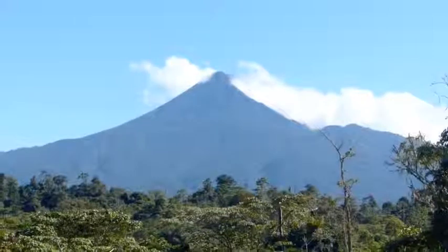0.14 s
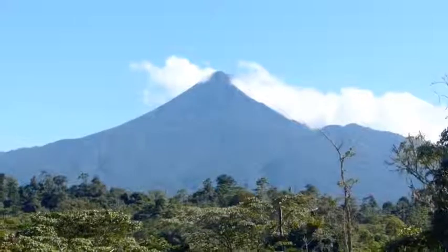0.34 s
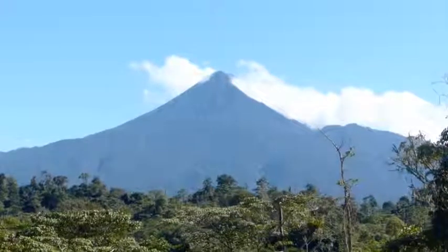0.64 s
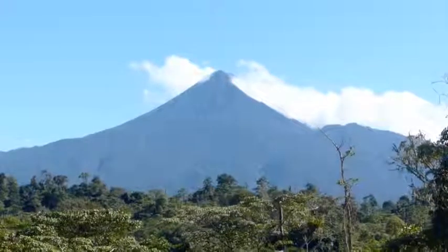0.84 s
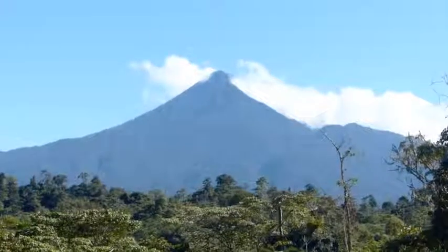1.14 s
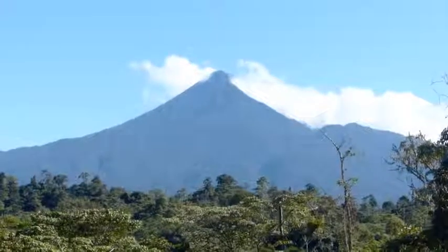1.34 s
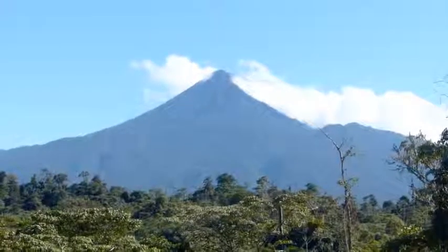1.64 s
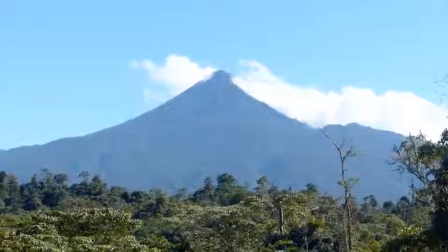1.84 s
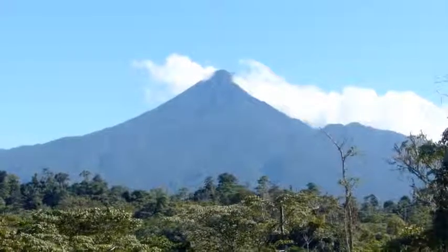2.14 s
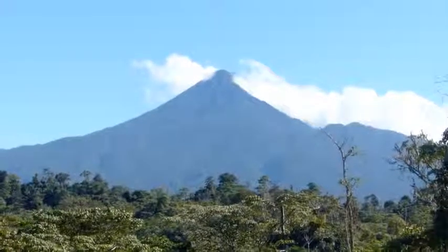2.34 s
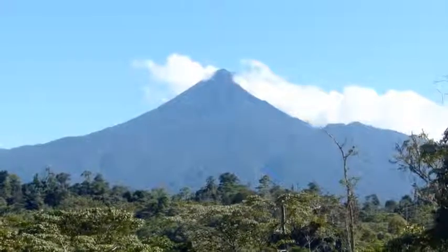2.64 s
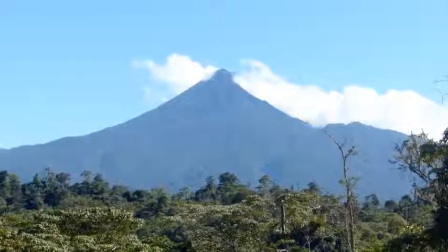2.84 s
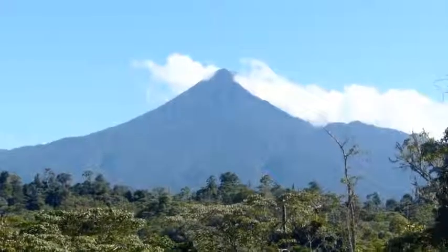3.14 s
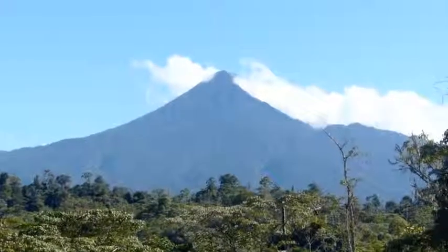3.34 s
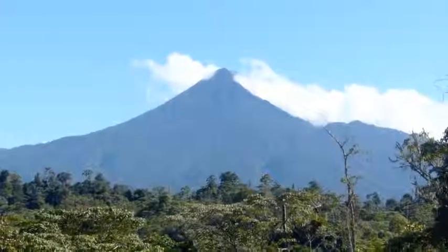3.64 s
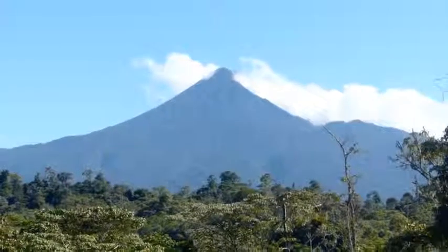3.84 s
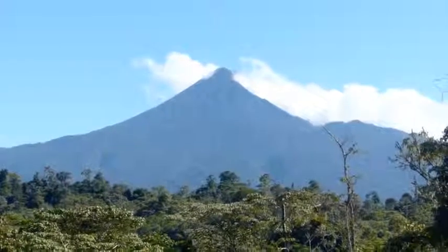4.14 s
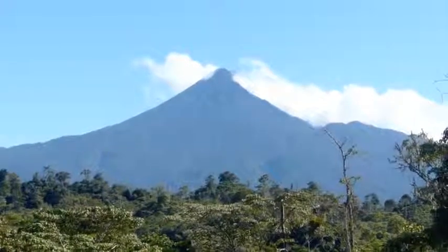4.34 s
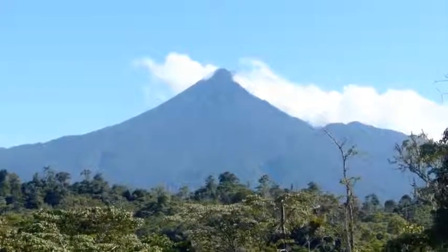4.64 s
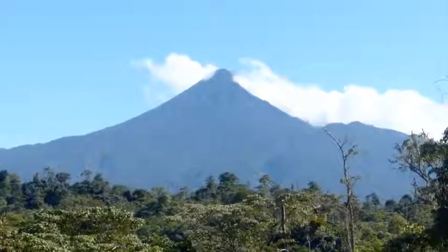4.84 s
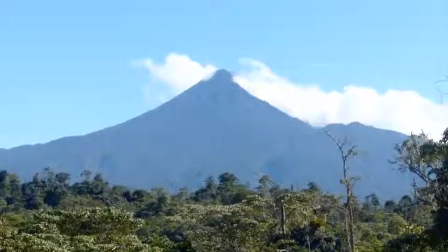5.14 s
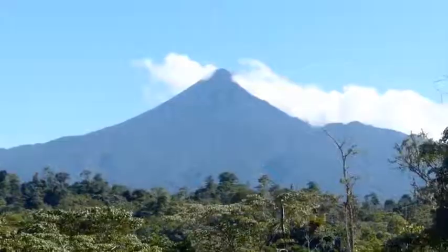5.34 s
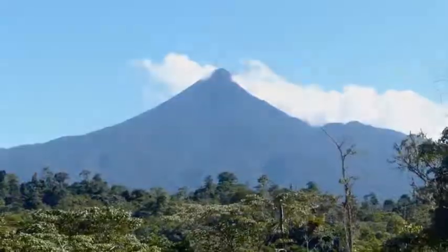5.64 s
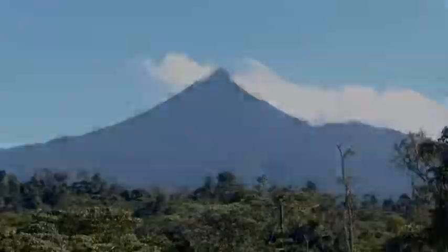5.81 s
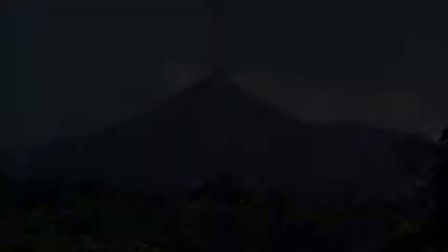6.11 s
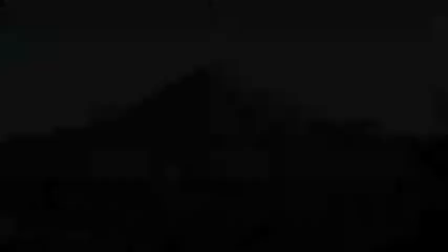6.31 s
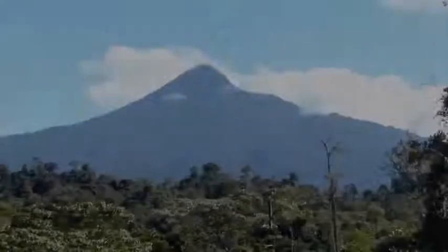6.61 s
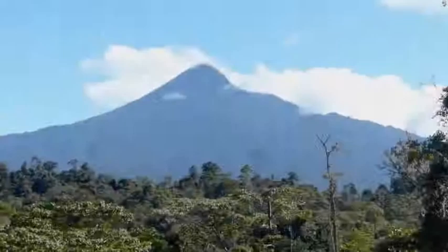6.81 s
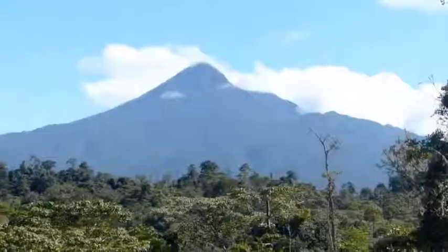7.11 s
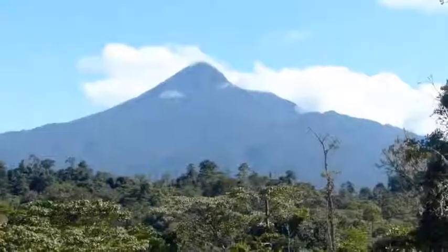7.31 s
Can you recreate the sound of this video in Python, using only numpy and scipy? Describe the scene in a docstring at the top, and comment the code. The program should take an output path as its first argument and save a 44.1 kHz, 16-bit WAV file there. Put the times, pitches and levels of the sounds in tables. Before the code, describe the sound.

Quiet mountain rainforest with a steady high cricket chorus, quick trills and paired chirps. Distant raspy bird chatter and faint whistles come first, then a nearer bird gives clear falling whistles and a drawn-out sinking note. Insects continue alone, fade to brief silence, then return with rising whistles and hoarse falling notes. Open, wide outdoor pickup with soft wind rumble and short woodland echoes.

```python
"""Mountain rainforest: crickets trill and chirp over a hissing chorus while a bird whistles a falling phrase.
Birds are gliding near-sines, and crickets are rows of short tones; both echo off trunks and canopy.
Raspy chatter is noise through a moving throat resonance; air, leaves, knocks and wind are shaped noise.
The sound fades out, then back in as another song begins, with mostly rising whistles and hoarse falling notes."""
import sys
import numpy as np
from scipy import signal
from scipy.fft import rfft, irfft
from scipy.io import wavfile
from scipy.ndimage import uniform_filter1d

SR = 44100
rng = np.random.default_rng(int(sys.argv[2]) if len(sys.argv) > 2 else 0)


def unload_audio(sound):
    """Save the sound as a 16-bit wav file, at the path given as the first command line argument."""
    columns = np.transpose(np.atleast_2d(sound))
    # keep every value between -1 and 1, then stretch to whole-number steps
    steps = np.round(np.clip(columns, -1, 1) * 32767)
    wavfile.write(sys.argv[1], SR, steps.astype(np.int16))


N = 329418
TIME = np.arange(N) / SR

# Event levels are relative: each layer adds its own trim, and the trees and the final fade follow.
# Noise spectra give only the colour: the noise is scaled to rms 1 afterwards.

# air in the far canopy, spectrum: [f/Hz, level/dB]
AIR = [(71, -47.5), (120, -13), (484, 1), (785, 2.5), (958, -2.5), (1030, -0.5), (1330, -4), (1720, -4.5),
       (2100, -8.5), (3600, -15.5), (4680, -53.5), (7920, -120)]
# rise and fall of the air: [t/s, level/dB]
AIR_DB = [(0, -58.5), (.8, -60), (2.3, -59.5), (2.85, -57.5), (4.0, -57.5), (4.7, -60), (6.5, -59.5),
          (7.47, -55)]
# fine hiss, spectrum: [f/Hz, level/dB]
HISS = [(2500, -12), (3600, -2.5), (6800, -1), (9000, -0.5), (11500, 0), (13000, -7.5), (15000, -13.5)]
# rise and fall of the hiss: [t/s, level/dB]
HISS_DB = [(0, -68.5), (1.8, -68), (3.0, -66), (5.3, -67.5), (6.5, -68.5), (7.47, -62.5)]
# left-right likeness of the noise from all around: [f/Hz, correlation -1..1]
SAME = [(60, 0.73), (130, 0.78), (290, -0.73), (640, -0.95), (1410, -0.44), (3100, 0.36), (6800, 0.5),
        (15000, 0.31)]
# phase by which left leads right in that noise: [f/Hz, phase/rad]
LEAD = [(60, -1.6), (300, -0.96), (1300, -0.67), (2500, 0.081), (15000, -1)]
# wind rumble, spectrum: [f/Hz, level/dB]
RUMBLE = [(15, -28.5), (35, -1.5), (70, -7), (130, -10.5), (250, -15.5), (500, -42)]
# strongest buffets of wind on the microphone: [t/s, level/dB]
BUFFETS = [(.08, -70), (.22, -68), (.56, -71), (.87, -65), (1.14, -71), (1.37, -66), (1.65, -65),
           (1.86, -69), (2.18, -61.5), (2.31, -60), (2.78, -60.5), (2.87, -58), (3.02, -62), (3.17, -59),
           (3.48, -62), (3.74, -64.5), (4.86, -66), (5.33, -74), (5.51, -69), (7.09, -65), (7.19, -68)]
# length of a buffet; level and rms unsteadiness of the draught under them
BUFFET_S, DRAUGHT_DB, DRAUGHT_SWING_DB = 0.029, -76, 2

# far cricket chorus, spectrum: [f/Hz, level/dB]
CHORUS = [(3500, -28), (4200, -12), (4650, -6.5), (4900, -6.5), (5150, -4), (5400, -2.5), (5700, -3),
          (6200, -13), (6600, -17.5), (7500, -34.5)]
# how hard the chorus and the trilling crickets sing: [t/s, level/dB]
EFFORT = [(0, -1), (1.6, -2), (2.5, -1), (4.2, -0.6), (5.3, 0), (6.5, -2.5), (7.47, 0)]
# runs of a low cricket's double chirps: [first t/s, last t/s, pairs, f/Hz, level/dB]
CHIRPS = [(.10, 1.085, 5, 4424, -58.5), (1.305, 2.605, 7, 4424, -60.5), (2.785, 3.135, 3, 4424, -61),
          (3.40, 3.89, 3, 4424, -59), (4.165, 4.896, 4, 4434, -58.5), (5.13, 5.99, 5, 4410, -58),
          (6.585, 7.40, 5, 4560, -55)]
# runs of its neighbour's single chirps: [first t/s, last t/s, chirps, f/Hz, level/dB]
ANSWERS = [(6.51, 6.74, 3, 4670, -59), (6.935, 7.16, 2, 4670, -58), (7.27, 7.36, 2, 4690, -51)]

# syllables of raspy chatter: [peak t/s, level/dB]
CHATTER = [(.01, -55.5), (.125, -51), (.20, -54.5), (.295, -50), (.40, -51), (.56, -47.5), (.94, -50),
           (1.145, -51.5), (1.275, -49.5), (1.35, -54.5), (1.44, -49.5), (1.555, -52), (1.70, -46.5),
           (2.06, -58), (2.135, -52), (2.32, -50), (2.46, -50.5), (2.54, -54.5), (2.635, -48.5),
           (2.745, -50.5), (2.87, -46)]
# rasp of the chatter, spectrum: [f/Hz, level/dB]
RASP = [(410, -48.5), (700, -42.5), (921, -5.5), (1030, -15), (1310, -10.5), (1610, -7.5), (2310, -10),
        (2570, -8.5), (3600, -25.5), (4680, -57.5), (7920, -120)]
SYLLABLE_RISE_S, SYLLABLE_HOLD_S, SYLLABLE_FALL_DB_PER_S = 0.027, 0.016, 106
LINGER_DB, LINGER_FALL_DB_PER_S = -15, 17  # each syllable lingers in the valley
# throat resonance: its pitch at a syllable level of THROAT_AT_DB, and its climb with that level
THROAT_HZ, THROAT_HZ_PER_DB, THROAT_AT_DB = 1714, 21, -50.5

# far whistles among the chatter: [t/s, length/s, from f/Hz, to f/Hz, level/dB]
FAR_CALLS = [(.16, 0.26, 1458, 1612, -54.5), (.455, 0.059, 1282, 1070, -53.5), (.86, 0.067, 1093, 954, -61),
             (1.29, 0.33, 1530, 1574, -54.5), (1.58, 0.099, 1333, 1084, -53),
             (2.045, 0.05, 1492, 1060, -57), (2.47, 0.096, 1680, 1495, -50),
             (2.79, 0.14, 1254, 1130, -54.5)]
# leaf rustles: [t/s, level/dB, length/s]
RUSTLES = [(.24, -57.5, 0.036), (0.861, -51.5, 0.024), (1.345, -57, 0.023), (2.902, -58, 0.022),
           (3.105, -56.5, 0.038), (3.22, -61, 0.03), (3.757, -56, 0.059)]
# leaves, spectrum: [f/Hz, level/dB]
LEAVES = [(2000, -5.5), (3500, 0), (6500, 2), (9500, -1.5), (12000, -17.5), (15000, -41)]
# thin high falling call: [t/s, length/s, from f/Hz, to f/Hz, level/dB]
HIGH_CALLS = [(.255, .225, 6090, 4055, -48)]
# one sharp high call that climbs and drops: [t/s, f/Hz, level/dB]
SHARP_CALL = [(2.772, 4450, -55.5), (2.787, 4990, -33), (2.805, 5050, -33), (2.825, 5410, -33.5),
              (2.842, 4020, -52.5), (2.90, 2870, -54.5)]
# soft dull knocks: [t/s, level/dB, length/s]
KNOCKS = [(.89, -57, 0.015), (2.325, -54, 0.022), (3.02, -50.5, 0.0094), (7.22, -58, 0.024)]
# knocks, spectrum: [f/Hz, level/dB]
KNOCK = [(200, -14), (450, -15), (720, -0.5), (1000, -0.5), (1800, -21), (4000, -62)]

# falling notes of the main bird, pitch before the opening flick:
# [t/s, length/s, from f/Hz, to f/Hz, level/dB, flick decay/s]
PHRASE = [(1.629, .095, 2147, 1375, -45, 0.0017), (2.156, 0.2, 2273, 1347, -39.5, 0.043),
          (2.785, 0.21, 2540, 1396, -40, 0.0021), (3.167, 0.13, 2084, 1268, -40, 0.0027),
          (3.445, .134, 2050, 1233, -39, .007), (3.686, 0.12, 2124, 1280, -38, .009)]
# drawn-out note that ends the phrase: [t/s, f/Hz, level/dB]
LONG_NOTE = [(4.005, 1427, -51), (4.045, 1488, -46.5), (4.095, 1493, -43), (4.22, 1310, -52),
             (4.285, 1245, -48), (4.39, 1171, -66.5), (4.44, 1150, -55), (4.49, 1110, -58)]
# overtones let out by the beak: [f/Hz, level relative to the note/dB]
OVERTONES = [(2500, -42.5), (4500, -34), (6500, -38.5), (8000, -16), (9200, -20), (10500, -32),
             (13000, -48.5)]
FLICK = .25  # a falling note starts this share above its pitch, up to the ceiling
CEILING_HZ = 2625  # pitch cap of a falling note, before its waver
PHRASE_BEND = .5  # how much the fall flattens towards its end
GROUND_S = .00671  # delay of the main bird's bounce off the ground

# faint calls from behind the foliage: [t/s, length/s, from f/Hz, to f/Hz, level/dB]
HIDDEN_CALLS = [(2.875, .092, 5200, 3780, -55.5), (3.075, 0.073, 3900, 4500, -58),
                (3.142, 0.053, 4450, 3760, -61), (3.147, .042, 3450, 2860, -60),
                (5.238, .035, 10400, 8200, -63), (6.474, .05, 6000, 7980, -56)]
# brief thin squeaks in the later song: [t/s, length/s, from f/Hz, to f/Hz, level/dB]
SQUEAKS = [(6.51, 0.017, 3080, 3430, -59), (6.832, .016, 3700, 2950, -62), (7.324, 0.019, 3500, 4300, -63)]
# mostly rising notes of the later song: [t/s, length/s, from f/Hz, to f/Hz, level/dB,
# bend (higher settles sooner), crest as share of the length, level at the ends relative to the crest/dB]
LATE_SONG = [(6.477, .032, 2610, 2570, -53.5, 1, .35, -10),
             (6.594, 0.064, 1256, 1387, -51.5, 2.7, 0.46, -9),
             (6.714, 0.087, 2230, 2694, -47.5, 0.75, 0.22, -3),
             (6.906, 0.071, 1180, 1405, -51, 2.5, 0.5, -11),
             (7.016, .114, 2690, 3830, -38.5, 3.8, .76, -30), (7.328, .155, 2650, 3660, -49, 6.5, 0.44, -6),
             (7.335, 0.13, 4900, 4710, -51.5, 1, 0.22, -8)]
# overtones of the later song: [f/Hz, level relative to the note/dB]
LATE_OVERTONES = [(2500, -8), (5000, -16), (7400, -12.5), (9000, -34), (11000, -19), (14000, -51)]
# hoarse falling notes between those of the later song: [t/s, length/s, from f/Hz, to f/Hz, level/dB]
HOARSE_NOTES = [(6.513, 0.054, 2724, 1340, -49.5), (6.833, 0.057, 2735, 1300, -46),
                (7.172, .06, 2480, 1285, -45.5)]

# fade out and back in: [t/s, gain]
FADE = [(5.62, 0.89), (6.335, 0), (6.477, 0), (6.48, 0.36), (7.08, 0.9)]
EDGE_HZ = 15300  # top of the band


def amp(db):
    """Decibels to gain."""
    return 10 ** (np.asarray(db) / 20)


def unit(x):
    """Scales to rms 1."""
    return x / np.sqrt(np.mean(x ** 2) + 1e-20)


def curve(rows, t=TIME):
    """Joins (s, value) rows by straight lines."""
    return np.interp(t, *np.transpose(rows))


def by_hz(rows, hz):
    """Reads (Hz, value) rows on a log-frequency axis."""
    f, value = np.transpose(rows)
    return np.interp(np.log(hz + 1), np.log(f + 1), value)


def add(mix, s, sound):
    """Adds a sound into the mix at time s."""
    part = mix[max(round(s * SR), 0):][:len(sound)]
    part += sound[:len(part)]


def wander(rate_hz):
    """Random drift of rms 1, with movement up to about the given rate."""
    hz = np.fft.rfftfreq(N, 1 / SR)
    smoothed = rfft(rng.standard_normal(N)) / (1 + (hz / rate_hz) ** 4)
    return unit(irfft(smoothed, N))


def swells(rows):
    """A short bell-shaped swell for each (s, dB, length) row."""
    return sum(amp(db) * np.exp(-((TIME - s) / length) ** 2) for s, db, length in rows)


def diffuse(spectrum):
    """Noise from all around: likeness and phase between the two ears vary with frequency."""
    hz = np.fft.rfftfreq(N, 1 / SR)
    left, other = rfft(rng.standard_normal((2, N)))
    same = np.clip(by_hz(SAME, hz), -1, 1)
    right = same * left + np.sqrt(1 - same ** 2) * other
    right = right * np.exp(-1j * by_hz(LEAD, hz))
    return unit(irfft(np.array([left, right]) * amp(by_hz(spectrum, hz)), N))


def frontal(spectrum, side_db):
    """Noise from ahead, with a weaker part that differs between the ears."""
    colour = amp(by_hz(spectrum, np.fft.rfftfreq(N, 1 / SR)))
    mid, side = rfft(rng.standard_normal((2, N))) * colour
    side = amp(side_db) * side
    return unit(irfft(np.array([mid + side, mid - side]), N))


def forest(x, echo_db, tail_db, t60, pan_db, direct_db=0, count=10):
    """Direct sound, a few echoes off near trunks, and a tail scattered by the canopy."""
    t = np.arange(SR) / SR
    trunks = np.zeros((2, SR))
    at = rng.uniform(0.0066, 0.045, count)
    sign = rng.choice([-1., 1.], count)
    for ear, delay in zip(trunks, rng.uniform(0, .00008, (2, count))):
        ear[((at + delay) * SR).astype(int)] = sign / np.sqrt(count)
    tail_shape = amp(-60 * t / t60) * (1 - np.exp(-t / 0.016))  # builds up, then dies away
    mid, side = rng.standard_normal((2, SR)) * tail_shape
    tail = np.array([mid + .5 * side, mid - .5 * side])
    paths = amp(echo_db) * trunks + amp(tail_db) * tail / np.linalg.norm(tail[0])
    paths[:, 0] += amp(direct_db)
    pan = amp([[pan_db / 2], [-pan_db / 2]])  # positive leans left
    return signal.fftconvolve(x[None], paths, axes=1)[:, :N] * pan


def glide(start, length, from_hz, to_hz, db, bend, crest, edge_db):
    """One note as (s, Hz, dB): pitch slides and settles; level swells from edge_db to a crest and sinks."""
    u = np.linspace(0, 1, num=64)
    slide = np.expm1(-bend * u) / np.expm1(-bend)
    away = np.interp(u, [0, np.clip(crest, .05, .95), 1], [1, 0, 1])  # distance from the crest
    hz = from_hz + (to_hz - from_hz) * slide
    return np.transpose([start + length * u, hz, db + edge_db * away ** 2])


def glides(rows, bend, crest, edge_db):
    """Notes that share one shape."""
    return [glide(*row, bend, crest, edge_db) for row in rows]


def whistles(notes, gain_db, overtone_db, waver, flutter_db, overtones=OVERTONES, order=7):
    """Each note is a gliding near-sine with overtones; pitch wavers (rms share) and level flutters (rms dB)."""
    out = np.zeros(N)
    unsteady = 1 + waver * wander(140)
    flutter = flutter_db * wander(88)
    for rows in notes:
        s, pitch, level = np.transpose(rows)
        t = np.arange(s[0] - .004, s[-1] + 0.0037, 1 / SR)
        smooth_pitch = uniform_filter1d(np.interp(t, s, pitch), size=400)
        hz = smooth_pitch * np.interp(t, TIME, unsteady)
        phase = 2 * np.pi * np.cumsum(hz) / SR
        tone = np.sin(phase)
        for k in range(2, order + 1):
            strength = amp(overtone_db + by_hz(overtones, k * hz))
            tone += strength * np.sin(k * phase) * (k * hz < EDGE_HZ)
        edges = np.clip(np.minimum(t - t[0], t[-1] - t) / 0.0021, 0, 1)
        db = gain_db + np.interp(t, s, level) + np.interp(t, TIME, flutter)
        add(out, t[0], np.sqrt(2) * amp(db) * edges * tone)
    return out


def canopy_air(gain_db=3):
    """Air in the far canopy: diffuse noise, mostly low, whose level drifts."""
    return diffuse(AIR) * amp(gain_db + curve(AIR_DB) + 1.48 * wander(23))


def fine_hiss(gain_db=7):
    """Fine diffuse treble noise with a lightly drifting level."""
    return diffuse(HISS) * amp(gain_db + curve(HISS_DB) + 1.1 * wander(25))


def wind_rumble(gain_db=-1):
    """Wind on the microphone: low noise in short buffets over an unsteady draught."""
    draught = amp(DRAUGHT_DB + DRAUGHT_SWING_DB * wander(13))
    wind = draught + swells([(s, db, BUFFET_S) for s, db in BUFFETS])
    return frontal(RUMBLE, side_db=-38.5) * amp(gain_db) * wind


def cricket_chorus():
    """Countless far crickets blur into a flickering band of noise."""
    chorus = amp(-55.0) * frontal(CHORUS, side_db=-7.0) * amp(1.57 * wander(70))
    return amp(curve(EFFORT)) * chorus


def chatter_db():
    """Level of the chatter: each syllable rises fast, holds, falls away and lingers."""
    t, power = TIME[::64], 1e-12
    for s, db in CHATTER:
        rise = np.exp(-(np.minimum(t - s, 0) / SYLLABLE_RISE_S) ** 2)
        after = np.maximum(t - s - SYLLABLE_HOLD_S, 0)
        fall = amp(-SYLLABLE_FALL_DB_PER_S * after)
        linger = amp(LINGER_DB - LINGER_FALL_DB_PER_S * after)
        power = power + (amp(db) * rise) ** 2 * (fall ** 2 + linger ** 2)
    return np.interp(TIME, t, 10 * np.log10(power))


def chatter(width_hz=600, rough_db=1.0, throat_db=4):
    """Far harsh calls: rattling noise through a throat resonance that rises with each syllable."""
    db = chatter_db()
    rasp = frontal(RASP, side_db=-7.5) * amp(rough_db * wander(37))
    centre_hz = THROAT_HZ + THROAT_HZ_PER_DB * np.maximum(db - THROAT_AT_DB, -10)
    # shift the centre down to 0 Hz, low-pass, and shift back: a resonance that moves
    turn = np.exp(2j * np.pi * np.cumsum(centre_hz) / SR)
    r = np.exp(-np.pi * width_hz / SR)
    throat = 2 * (turn * signal.lfilter([1 - r], [1, -r], rasp / turn)).real
    return amp(db) * unit(rasp + amp(throat_db) * throat)


def trill(level_db, hz, sweep_hz, bursts_hz, strokes_hz, stroke_s, uneven_db, count=4):
    """A cricket closes its wings a few times in each burst; every stroke is a short falling tone."""
    out, u = np.zeros(N), np.linspace(0, 1, int(stroke_s * SR))
    stroke_hz = hz + sweep_hz * (.5 - u)
    stroke = np.sin(np.pi * u) * np.sin(2 * np.pi * np.cumsum(stroke_hz) / SR)
    chance = rng.standard_normal((120, count + 1))
    starts = np.cumsum(1 + .03 * chance[:, 0]) / bursts_hz - .04
    for s, sizes in zip(starts, chance[:, 1:]):
        for k, size in enumerate(sizes):  # a stronger stroke also comes slightly later
            add(out, s + (k + .025 * size) / strokes_hz, amp(uneven_db * size) * stroke)
    return amp(level_db) * unit(out)


def near_cricket():
    """A near cricket trills in quick bursts of short, steeply falling strokes."""
    song = trill(level_db=-58, hz=5220, sweep_hz=750, bursts_hz=11.3,
                 strokes_hz=78.5, stroke_s=.0065, uneven_db=1.6)
    return amp(curve(EFFORT)) * forest(song, echo_db=-12, tail_db=-7.0, t60=0.12, pan_db=3)


def chirp_runs(runs, chirp_s=.028, uneven_db=.7, stray_hz=12):
    """Short pure chirps at an even pace, each a little different in pitch and strength."""
    out, t = np.zeros(N), np.arange(0, chirp_s, 1 / SR)
    swell = np.sqrt(2) * signal.windows.tukey(len(t), .5)
    for first, last, count, hz, db in runs:
        for s in np.linspace(first, last, round(count)):
            size, stray = rng.standard_normal(2)
            tone = np.sin(2 * np.pi * (hz + stray_hz * stray) * t)
            add(out, s - chirp_s / 2, amp(db + uneven_db * size) * swell * tone)
    return out


def chirping_crickets(gap_s=.055, gain_db=-2):
    """A lower cricket gives pairs of short pure chirps; later a neighbour answers with single ones."""
    chirps = chirp_runs(CHIRPS) + chirp_runs(ANSWERS)
    add(chirps, gap_s, chirp_runs(CHIRPS))  # second chirp of each pair
    return forest(amp(gain_db) * chirps, echo_db=-16, tail_db=-7.5, t60=.3, pan_db=-4.0)


def farther_cricket():
    """A farther cricket trills more slowly, with longer, nearly level strokes."""
    song = trill(level_db=-65.0, hz=5437, sweep_hz=79.5, bursts_hz=6.2,
                 strokes_hz=89, stroke_s=0.017, uneven_db=2.0)
    return amp(curve(EFFORT)) * forest(song, echo_db=-11.0, tail_db=-6.5, t60=0.29, pan_db=-4.5)


def far_calls():
    """Far whistles, where the scattered tail outweighs the direct sound."""
    song = whistles(glides(FAR_CALLS, bend=1.54, crest=.3, edge_db=-6.5),
                    gain_db=-4, overtone_db=-16, waver=0.036, flutter_db=1.5, order=2)
    return forest(song, echo_db=-8, tail_db=3.0, t60=0.35, pan_db=-3)


def leaf_rustles():
    """Leaves rustle: bright noise in brief swells, crackling with fast random level jumps."""
    return frontal(LEAVES, side_db=-15) * swells(RUSTLES) * amp(4.7 * wander(200))


def high_calls():
    """Thin high whistles: one long fall, and one sharp call that climbs and drops."""
    notes = glides(HIGH_CALLS, bend=1.3, crest=0.52, edge_db=-12) + [SHARP_CALL]
    song = whistles(notes, gain_db=-1, overtone_db=-17.5, waver=.012, flutter_db=2.5, order=2)
    return forest(song, echo_db=-10, tail_db=-10.0, t60=0.37, pan_db=-2.5)


def dull_knocks():
    """Soft knocks: short swells of low-mid noise."""
    return frontal(KNOCK, side_db=-11.5) * swells(KNOCKS)


def falling_note(start, length, from_hz, to_hz, db, flick_s, attack_s=0.015, release_s=0.024, drop_db=-12):
    """The main bird's note: a quick flick down, then a flattening fall, with a soft attack and release."""
    s, hz, level = glide(start, length, from_hz, to_hz, db, bend=PHRASE_BEND, crest=0.43, edge_db=-7.5).T
    t = s - start
    shut = np.maximum(1 - np.minimum(t / attack_s, (length - t) / release_s), 0)
    flick = 1 + FLICK * np.exp(-(t / flick_s) ** 2)
    return np.transpose([s, np.minimum(hz * flick, CEILING_HZ), level + drop_db * shut])


def main_bird():
    """A bounce off the ground beats against each falling note and breaks it into beads."""
    phrase = whistles([falling_note(*row) for row in PHRASE],
                      gain_db=-0.97, overtone_db=-1.5, waver=0.0142, flutter_db=2.5)
    ending = whistles([LONG_NOTE], gain_db=1, overtone_db=-6, waver=0.0037, flutter_db=2.5)
    song = phrase + ending
    bounce = .66 * np.interp(TIME - GROUND_S, TIME, song)
    return forest(song + bounce, echo_db=-11, tail_db=-14.5, t60=.55, pan_db=-.4)


def hidden_calls():
    """Faint calls and squeaks behind foliage: weaker direct sound, strong short scatter."""
    song = whistles(glides(HIDDEN_CALLS + SQUEAKS, bend=.8, crest=0.26, edge_db=-7.5),
                    gain_db=3, overtone_db=-12, waver=0.02, flutter_db=4, order=2)
    return forest(song, echo_db=-4.5, tail_db=-5.5, t60=0.18, pan_db=3, direct_db=-2)


def late_song():
    """The later song: mostly rising whistles, each with its own bend and swell, and one overtone."""
    song = whistles([glide(*row) for row in LATE_SONG], gain_db=-1.0, overtone_db=-4,
                    waver=0.0099, flutter_db=2.2, overtones=LATE_OVERTONES, order=2)
    return forest(song, echo_db=-5.5, tail_db=-3.5, t60=0.39, pan_db=3.5)


def hoarse_notes():
    """Falling whistles made hoarse by a strong, fast pitch waver."""
    song = whistles(glides(HOARSE_NOTES, bend=0.296, crest=0.13, edge_db=-3.5),
                    gain_db=-2, overtone_db=-8, waver=0.062, flutter_db=3.5, order=2)
    return forest(song, echo_db=-9.5, tail_db=-3.0, t60=0.3, pan_db=1, direct_db=-4)


def scene():
    """Everything that sounds in the forest."""
    breeze = canopy_air() + fine_hiss() + wind_rumble() + leaf_rustles() + dull_knocks()
    insects = cricket_chorus() + near_cricket() + chirping_crickets() + farther_cricket()
    birds = far_calls() + high_calls() + main_bird() + hidden_calls() + late_song() + hoarse_notes()
    return breeze + insects + chatter() + birds


def record(dry, offset=-0.0043):
    """The recorder's small steady offset, a fade out and in, then the band limit."""
    faded = (dry + offset) * np.clip(curve(FADE), 0, 1)
    low_pass = signal.firwin(511, EDGE_HZ, window=("kaiser", 9), fs=SR)
    return signal.oaconvolve(faded, low_pass[None], "same")


dry = scene()
out = record(dry)
unload_audio(out)
```